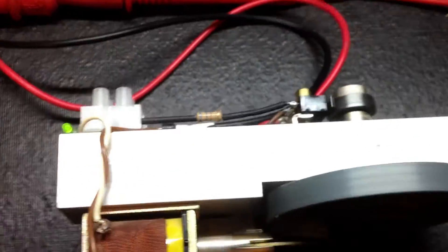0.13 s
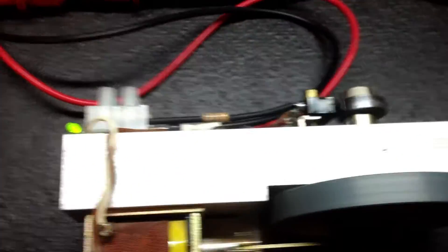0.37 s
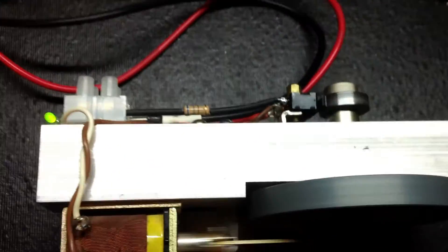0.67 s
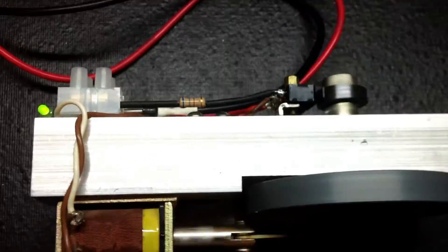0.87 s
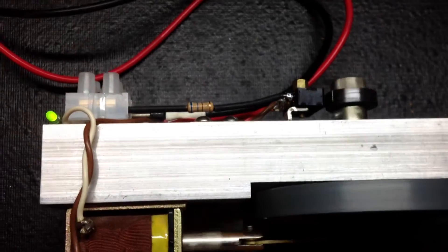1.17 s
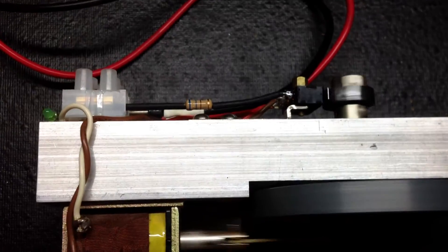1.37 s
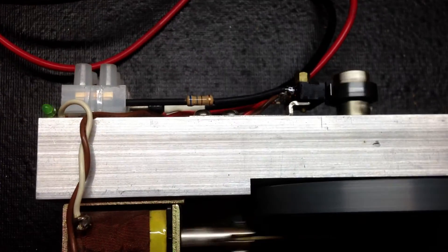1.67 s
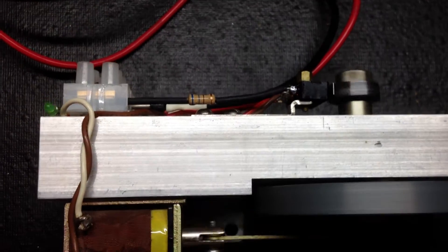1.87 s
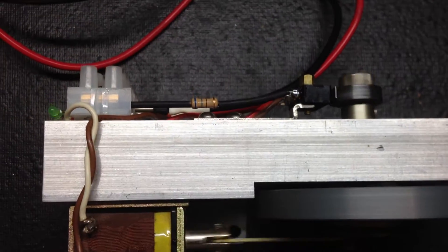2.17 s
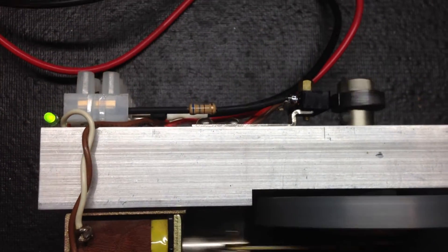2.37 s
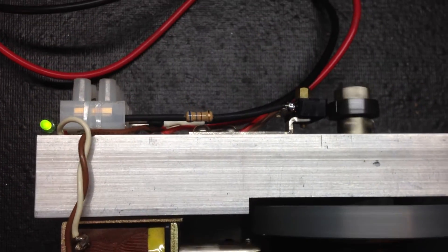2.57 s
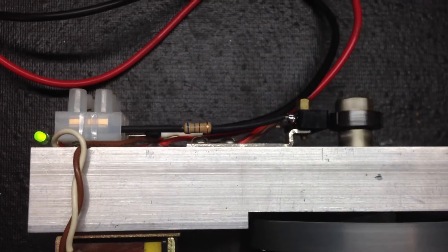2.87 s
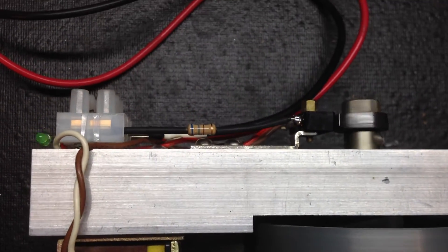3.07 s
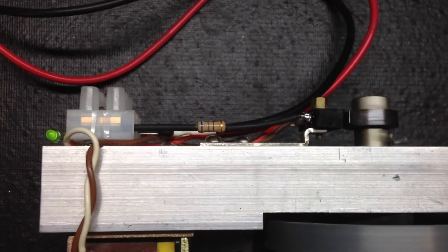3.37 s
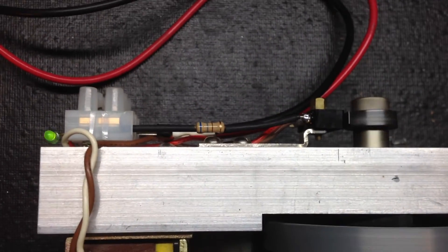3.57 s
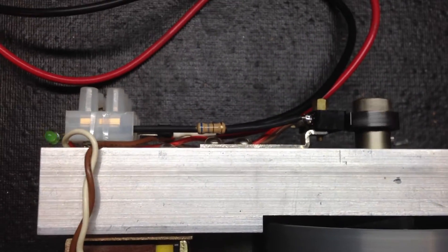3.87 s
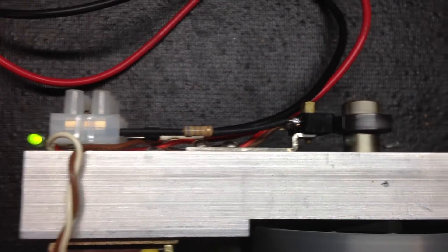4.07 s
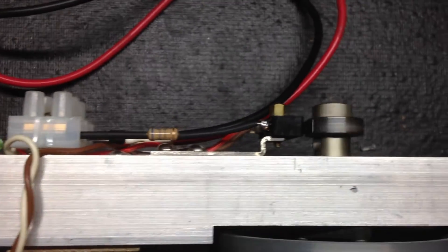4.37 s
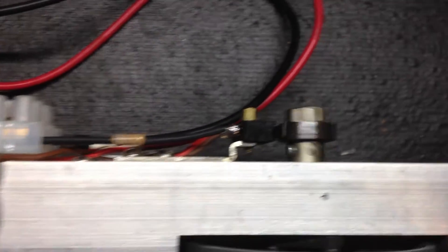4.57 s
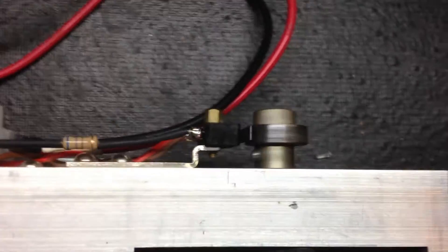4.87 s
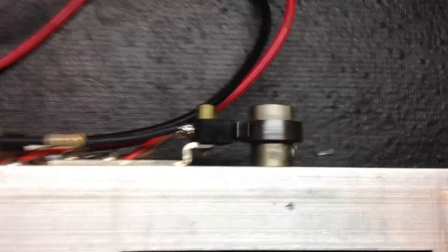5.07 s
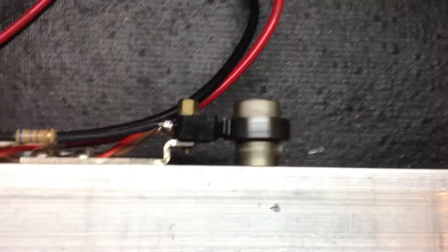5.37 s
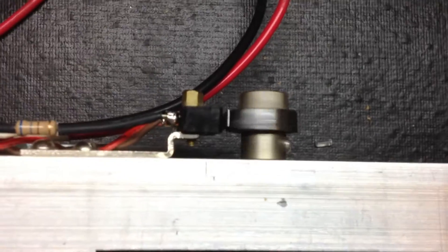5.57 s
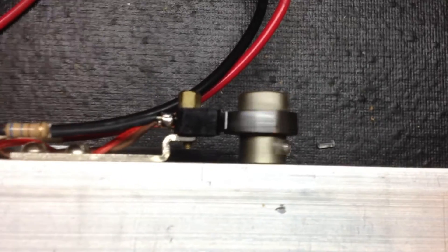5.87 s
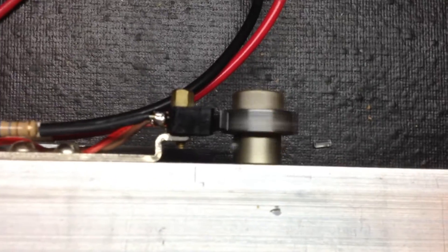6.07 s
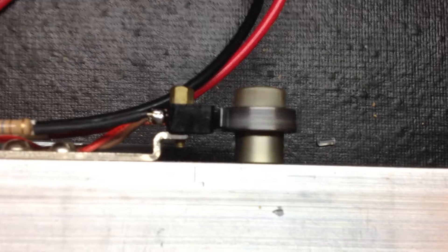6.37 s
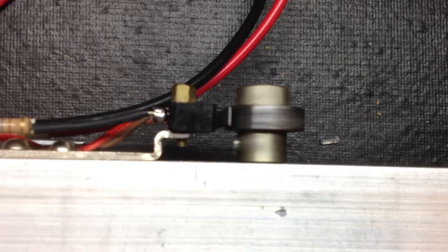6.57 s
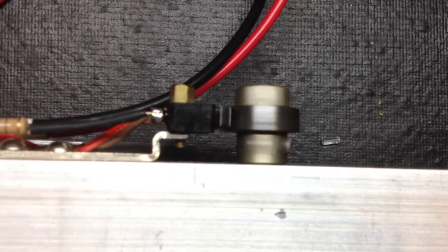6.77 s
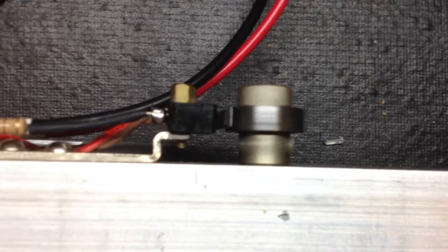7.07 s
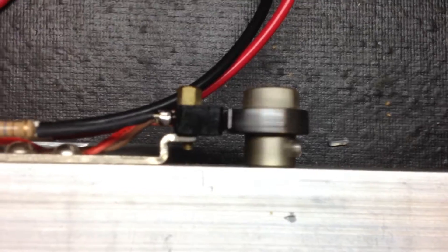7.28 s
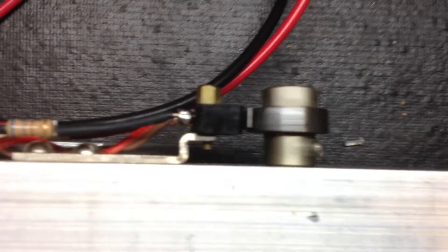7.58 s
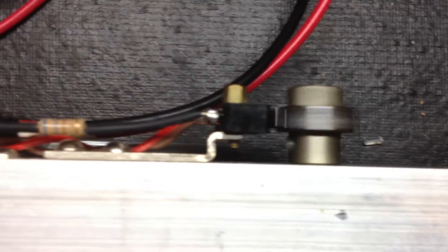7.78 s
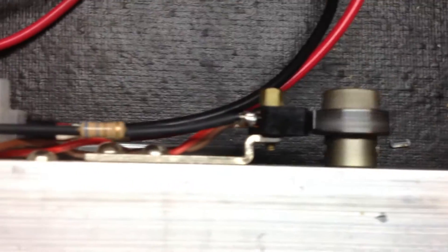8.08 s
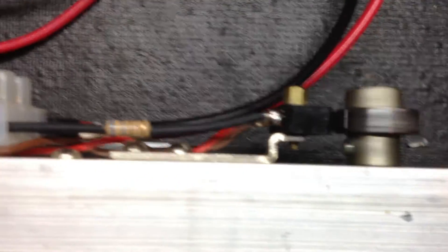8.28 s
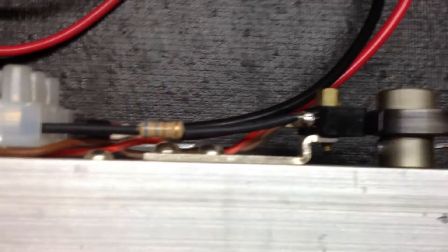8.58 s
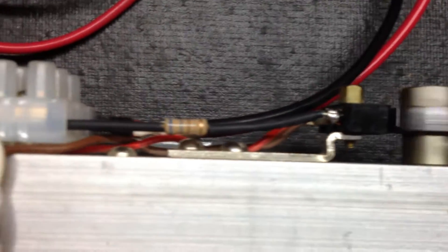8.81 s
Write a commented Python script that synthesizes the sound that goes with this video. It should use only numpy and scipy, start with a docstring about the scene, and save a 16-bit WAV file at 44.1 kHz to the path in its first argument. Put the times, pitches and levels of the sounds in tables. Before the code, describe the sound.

Fast, even mechanical chatter from a tiny engine: sharp, high clicks with quieter metallic taps and dry ticks between them. Beneath lie a constant low hum, a boomy fan draught and the airy whirr of a spinning wheel. The small room adds only a very short reflection. Around five seconds, brief handling rustles and a soft thump accompany the hand-held microphone moving closer, making the clicks brighter.

```python
"""A small homemade solenoid engine runs evenly on a bench, about 6.5 turns a second, close to a hand-held camera.
In every turn the cam snaps a microswitch, the steel plunger and its rod knock at both ends of the stroke,
and the switch lets go with a scratchy double tick: bursts of noise, dry or ringing the parts' resonances.
The flywheel rushes as filtered noise; under it the power supply hums in sines and its fan rumbles in noise.
The microphone moves closer halfway through, with two brief rustles and a bump."""
import sys
import numpy as np
from scipy import signal
from scipy.fft import rfft, irfft, next_fast_len
from scipy.io import wavfile
from scipy.ndimage import map_coordinates

SR = 44100
rng = np.random.default_rng(int(sys.argv[2]) if len(sys.argv) > 2 else 0)


def materialize(psi):
    """Save the field psi as 16-bit PCM at rate SR to the path in sys.argv[1].

    A 1-D psi becomes a single channel; in a 2-D psi each row is a channel.
    """
    bounded = np.clip(np.atleast_2d(psi).T, -1, 1)
    quanta = np.round(bounded * 32767).astype(np.int16)
    wavfile.write(sys.argv[1], SR, quanta)


N = 394430
HIT_SIZE = 4096  # samples laid down for each blow

# How near the microphone is to the switch and crank; each source follows it to its own degree.
# Each row: time in seconds, nearness in dB.
NEARNESS = [(0, -2), (2, -2.5), (4.3, -2.5), (5.2, 0.5), (7, 0), (8.9, 0.5)]
# Colour of the sliding cam and switch lever, also of the rod's dry touch.
# Each row: frequency in Hz, relative level in dB per Hz.
SCRATCH_COLOUR = [(1500, -32), (3500, -4.5), (5000, 4.5), (8000, 8), (11000, 3.5), (14000, 0), (16000, -12)]


def amp(db):
    """Decibels to gain."""
    return 10 ** (np.asarray(db) / 20)


def unit(x):
    """Each row at rms 1."""
    return x / np.sqrt(np.mean(x ** 2, axis=-1, keepdims=True) + 1e-20)


def wobble(rate):
    """A smooth random curve, rate knots a second."""
    knots = rng.standard_normal(int(N * rate / SR) + 4)
    return map_coordinates(knots, [np.arange(N) * rate / SR])


def along(curve, times):
    """A (seconds, value) table read at the given times."""
    return np.interp(times, *np.transpose(curve))


def shape(points):
    """The response through (Hz, dB) points on a log axis."""
    hz, db = np.transpose(points)
    return lambda f: amp(np.interp(np.log(f + 1), np.log(hz), db))


def filtered(x, response):
    """Each row of x through a response of frequency."""
    n = x.shape[-1]
    padded = next_fast_len(n + HIT_SIZE)
    spectrum = rfft(x, padded) * response(np.fft.rfftfreq(padded, 1 / SR))
    return irfft(spectrum, padded)[..., :n]


def noise(response):
    """Coloured noise of rms 1."""
    return unit(filtered(rng.standard_normal(N), response))


def scatter(times, spread):
    """A fresh random offset for each turn."""
    return spread * rng.standard_normal(len(times))


def engine():
    """All contacts of every turn: levels drift as the microphone moves and vary a little from turn to turn."""
    # Level of the switch's snap at the moving microphone. Each row: time in seconds, level in dB.
    snap_level = [(0, -52.5), (1.3, -53), (2.5, -52), (3, -49.5), (4.9, -50), (5.7, -48), (8.9, -49)]
    # The plunger's low ring, which fades while the microphone is over the switch.
    # Each row: time in seconds, level in dB.
    low_ring_level = [(0.5, -45), (2.3, -49), (3.2, -45.4), (5.5, -49), (5.9, -54), (6.8, -56.5),
                      (7.4, -48), (8.9, -50.5)]
    # The plunger's high ring, which grows as the microphone comes close.
    # Each row: time in seconds, level in dB.
    high_ring_level = [(0, -59.5), (0.65, -54.5), (1.1, -64), (2.4, -65), (3, -56.5), (4.5, -60.5),
                       (4.75, -51.5), (6.4, -48.5), (8.9, -55)]
    snap_s = turn_times()
    near_db = along(NEARNESS, snap_s)
    # the switch snaps much alike every turn; the loose rod seats differently (spreads in dB)
    snap_db = along(snap_level, snap_s) + scatter(snap_s, 0.4)
    low_db = along(low_ring_level, snap_s) + scatter(snap_s, 0.5)
    high_db = along(high_ring_level, snap_s) + scatter(snap_s, 2)
    return microswitch(snap_s, snap_db, near_db) + plunger(snap_s, low_db, high_db, near_db)


def turn_times():
    """When the cam meets the switch; the flywheel is already spinning, so one turn lies before the start."""
    # The flywheel's speed sags a little, then holds. Each row: time in seconds, turns a second.
    speed = [(0, 6.5044), (1.88, 6.4877), (4.48, 6.4431), (8.94, 6.452)]
    first_snap_s = 0.0752
    t = np.arange(-SR // 5, N) / SR
    turns = np.cumsum(along(speed, t)) / SR
    turns -= np.interp(first_snap_s, t, turns)
    return np.interp(np.arange(-1, turns[-1]), turns, t)


def microswitch(s, snap_db, near_db):
    """The cam snaps the switch over and it bounces; later the lever slides off and the contact drops back."""
    # The switch's resonances. Each row: frequency in Hz, width in Hz, relative level in dB.
    switch_modes = [(3860, 930, -12.5), (6850, 900, -60), (8130, 250, -11.5), (8360, 470, 0),
                    (8660, 130, -12), (10520, 1930, -7), (11300, 620, -15.5), (12700, 400, -9),
                    (15100, 230, -10), (14950, 200, -9.5)]
    snap = ring(s + 0.0005, snap_db + 0.16, switch_modes, rise=0.0003, t60=0.018, grit_db=6.5)
    crack = tick(s, snap_db - 11.5, SCRATCH_COLOUR, rise=0.0001, t60=0.003, grit_db=3)
    bounce_db = snap_db - 23 + scatter(s, 2.2)
    bounce = ring(s + 0.0085, bounce_db, switch_modes, rise=0.00088, t60=0.021, grit_db=6)
    # the scratchy double tick as the switch lets go
    slide_db = near_db - 58.5 + scatter(s, 1.5)
    drop_db = near_db - 53.5 + scatter(s, 0.31)
    slide_s = s + 0.0855 + scatter(s, 0.0005)
    drop_s = s + 0.0922 + scatter(s, 0.0005)
    slide = tick(slide_s, slide_db, SCRATCH_COLOUR, rise=0.0007, t60=0.024, grit_db=4)
    drop = tick(drop_s, drop_db, SCRATCH_COLOUR, rise=0.0004, t60=0.034, grit_db=4)
    return snap + crack + bounce + slide + drop


def plunger(s, low_db, high_db, near_db):
    """The rod takes up its play at each end of the stroke: the steel rings and the frame is knocked."""
    # The plunger's two rings, low then high. Each row: frequency in Hz, width in Hz, relative level in dB.
    low_modes = [(5560, 200, -12), (6092, 90, 0), (6900, 450, -19)]
    high_modes = [(12065, 75, 0), (12130, 450, -9)]
    # The aluminium frame under a knock. Each row: frequency in Hz, width in Hz, relative level in dB.
    frame_modes = [(667, 380, -1.5), (1433, 245, -1), (2604, 250, -2), (4900, 730, -7.5)]
    # the two ends of the stroke, in seconds after the switch's snap
    pull = s + 0.0612 + scatter(s, 0.0003)
    back = s + 0.1088 + scatter(s, 0.0003)
    # the pull seats the rod over a few milliseconds, so its low ring swells
    low = ring(pull + 0.0006, low_db + 0.5, low_modes, rise=0.001, t60=0.006, grit_db=1)
    back_low_db = near_db - 57.5 + scatter(s, 1.5)
    low += ring(back, back_low_db, low_modes, rise=0.0005, t60=0.014, grit_db=3)
    high = ring(pull, high_db + 0.7, high_modes, rise=0.0004, t60=0.005, grit_db=2)
    back_high_db = high_db - 2.5 + scatter(s, 1.5)
    high += ring(back, back_high_db, high_modes, rise=0.0002, t60=0.004, grit_db=2)
    pull_knock_db = -59 + scatter(s, 0.65)
    knock = ring(pull + 0.000995, pull_knock_db, frame_modes, rise=0.00016, t60=0.038, grit_db=0.5)
    knock += ring(back, -59.5 + scatter(s, 1), frame_modes, rise=0.00028, t60=0.031, grit_db=2)
    pull_touch_db = near_db - 63 + scatter(s, 1)
    touch = tick(pull, pull_touch_db, SCRATCH_COLOUR, rise=0.0002, t60=0.016, grit_db=3)
    back_touch_db = near_db - 57.5 + scatter(s, 1)
    touch += tick(back, back_touch_db, SCRATCH_COLOUR, rise=0.0005, t60=0.013, grit_db=3)
    return low + high + knock + touch


def ring(times, db, modes, rise, t60, grit_db):
    """Blows that ring a part's resonances in the same balance every time."""
    force = chatter(len(times), rise, t60, grit_db)
    hits = sum(amp(level) * unit(filtered(force, mode(hz, width))) for hz, width, level in modes)
    return place(times, db, hits)


def tick(times, db, spectrum, rise, t60, grit_db):
    """Dry contacts without a ring."""
    force = chatter(len(times), rise, t60, grit_db)
    return place(times, db, unit(filtered(force, shape(spectrum))))


def chatter(count, rise, t60, grit_db):
    """Contact forces, one row a blow: a short dying run of uneven tiny impacts; rise and t60 in seconds."""
    t = np.arange(HIT_SIZE) / SR
    draw = rng.standard_normal((count, 2, HIT_SIZE))
    impacts = draw[:, 0] * amp(grit_db * draw[:, 1])
    return impacts * (1 - np.exp(-t / rise)) * np.exp(-np.log(1000) * t / t60)


def mode(hz, width):
    """A resonance with steep skirts: it rings up softly and leaves the valleys beside it dark."""
    peak = lambda f: 1j * f * width / (hz * hz - f * f + 1j * f * width)
    return lambda f: peak(f) / (1 + 1j * (f - hz) / (4 * width)) ** 3


def place(times, db, hits):
    """Lay rows at their times; for a row of rms 1, db is its whole energy as an rms over 15 ms."""
    gain = amp(db)[:, None] * np.sqrt(0.015 * SR / HIT_SIZE)
    where = np.round(times * SR).astype(int)[:, None] + np.arange(HIT_SIZE)
    inside = (where >= 0) & (where < N)
    return np.bincount(where[inside], (hits * gain)[inside], N)


def room(x, onset, t60, count):
    """A short diffuse answer from bench and nearby walls.

    It is drawn anew for each of count equal stretches so no single tail colours the whole."""
    t = np.arange(SR // 5) / SR
    envelope = np.exp(-np.log(1000) * t / t60) * (1 - np.exp(-(t / onset) ** 2))
    tails = rng.standard_normal((count, len(t))) * envelope
    wet = np.zeros(N + len(t))
    for part, tail in zip(np.array_split(np.arange(N), count), tails):
        answer = signal.fftconvolve(x[part], tail / np.linalg.norm(tail))
        wet[part[0]:][:len(answer)] += answer
    return wet[:N]


def flywheel():
    """The spinning wheel's even rush; its whirr changes colour as the microphone nears the crank."""
    # Running whirr. Each row: frequency in Hz, width in Hz, level in dB at nearness 0,
    # dB gained per dB of nearness to the crank.
    whirr_modes = [(624.6, 33, -62.5, 1), (681.7, 24, -65.5, 0), (803, 33, -69.5, -1), (926, 94, -64, 1.1),
                   (1357, 31, -67, 1), (1724, 470, -69.5, -1.2), (2610, 345, -67, -0.96),
                   (2987, 160, -69, -.5)]
    # Running noise of flywheel and room air. Each row: frequency in Hz, relative level in dB per Hz.
    air_colour = [(100, -6.5), (500, -3), (800, -0.5), (1150, 0), (1550, -3), (2000, -6), (2700, -15),
                  (3400, -9.5), (5100, -9), (5700, -14), (7000, -14), (10500, -18.5), (13000, -22),
                  (16000, -27)]
    near_db = along(NEARNESS, np.arange(N) / SR)
    whirr = sum(amp(db + gain * near_db) * noise(mode(hz, width)) for hz, width, db, gain in whirr_modes)
    return whirr + amp(-55 + 0.39 * wobble(4.9)) * noise(shape(air_colour))


def supply():
    """The transformer hums at twice the mains rate beside a faint higher tone; the draught booms in the case."""
    # Steady tones. Each row: frequency in Hz, level in dB.
    hum_tones = [(120, -47.5), (517, -73)]
    # The supply's fan and case. Each row: frequency in Hz, relative level in dB per Hz.
    fan_colour = [(20, -42), (50, -36), (80, -21), (100, -16), (130, -1), (160, -5), (210, -0.5),
                  (280, -0.5), (300, -5.5), (345, -3), (400, -7), (480, -16), (700, -23), (1500, -58)]
    # Resonances of the supply's case. Each row: frequency in Hz, width in Hz, relative level in dB.
    case_modes = [(137.5, 12.8, 1.5), (227.8, 13, -6.5), (250, 3, -12), (271.9, 13.6, -6),
                  (320.5, 8.9, 0.5), (333.3, 15, -2.5)]
    t = np.arange(N) / SR
    hum = np.zeros(N)
    for hz, db in hum_tones:
        level = amp(db + 0.1 * wobble(4.3)) * np.sqrt(2)
        hum += level * np.sin(2 * np.pi * hz * t + 0.05 * wobble(4.3))
    boom = sum(amp(db) * noise(mode(hz, width)) for hz, width, db in case_modes)
    draught = amp(-45) * noise(shape(fan_colour)) + amp(-55) * boom
    return hum + draught * amp(0.13 * wobble(2.55) + 0.25 * along(NEARNESS, t))


def handling():
    """Soft rustles of swelling noise and a small dull bump as the camera is moved."""
    # The hand rubs the camera. Each row: middle in seconds, peak level in dB, half-length in seconds.
    rubs = [(4.645, -59, .05), (5.115, -57, .014)]
    # Colour of the rubbing. Each row: frequency in Hz, relative level in dB per Hz.
    rustle_colour = [(3000, -20), (7000, -9), (12500, 2), (15000, -3)]
    # A soft bump on the camera. Each row: start in seconds, level in dB.
    bumps = [(5.101, -44.5)]
    # Colour of the bump. Each row: frequency in Hz, relative level in dB per Hz.
    thud_colour = [(60, -25), (150, -6), (360, 2), (600, -3), (1000, -20), (1500, -34), (4000, -60)]
    t = np.arange(N) / SR
    swell = sum(amp(db) * np.exp(-((t - s) / half) ** 2) for s, db, half in rubs)
    rustle = swell * noise(shape(rustle_colour))
    bump = tick(*np.transpose(bumps), thud_colour, rise=0.0005, t60=0.004, grit_db=1)
    return rustle + bump


def scene():
    """The engine in its room, over the flywheel's rush, the supply's hum and the handling."""
    clicks = engine()
    walls = amp(-12) * room(clicks, onset=0.003, t60=0.07, count=40)
    return (clicks + walls + flywheel() + supply() + handling())[None]


def record(dry):
    """The camera keeps almost nothing above its band limit, a very steep cut."""
    top_hz = 15200
    return filtered(dry, lambda f: 1 / np.sqrt(1 + (f / top_hz) ** 200))


dry = scene()
out = record(dry)
materialize(out)
```